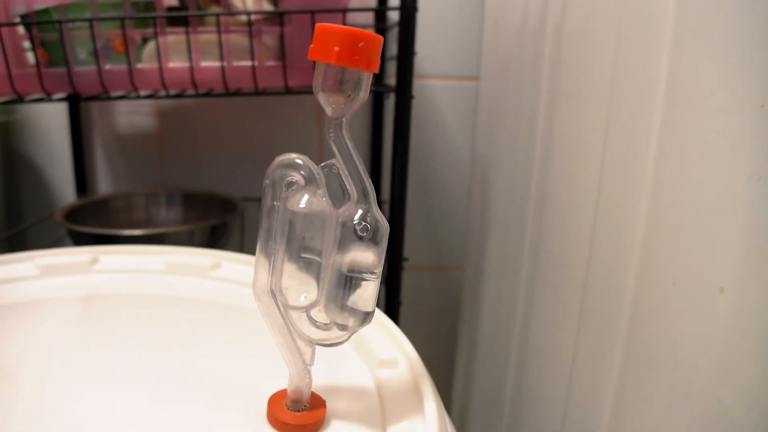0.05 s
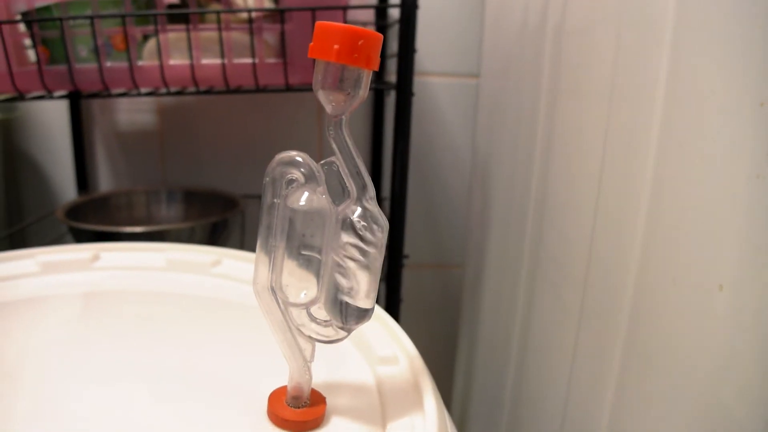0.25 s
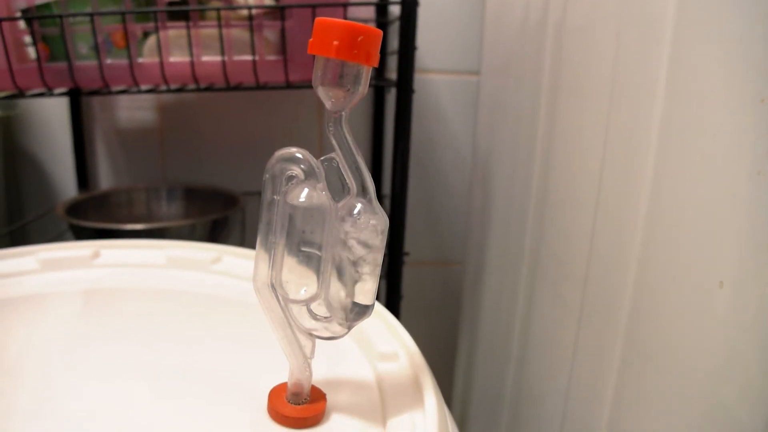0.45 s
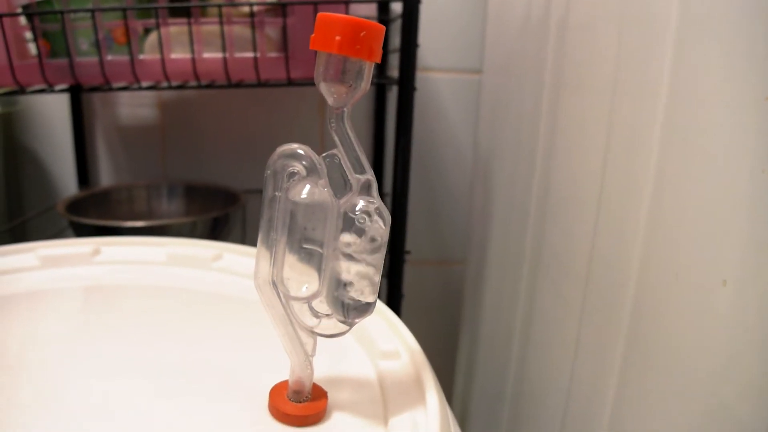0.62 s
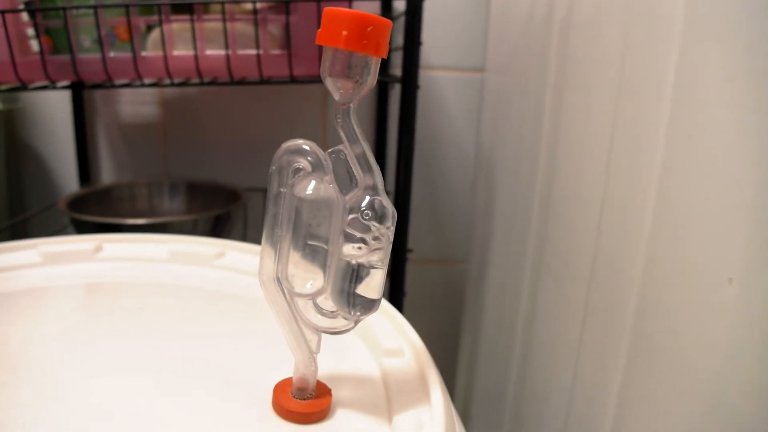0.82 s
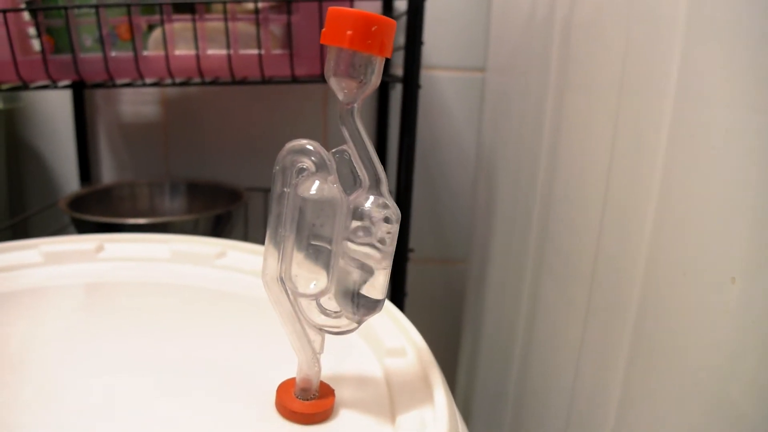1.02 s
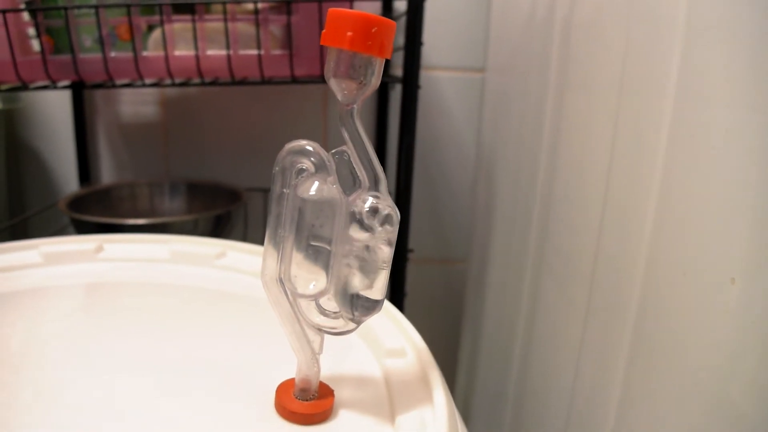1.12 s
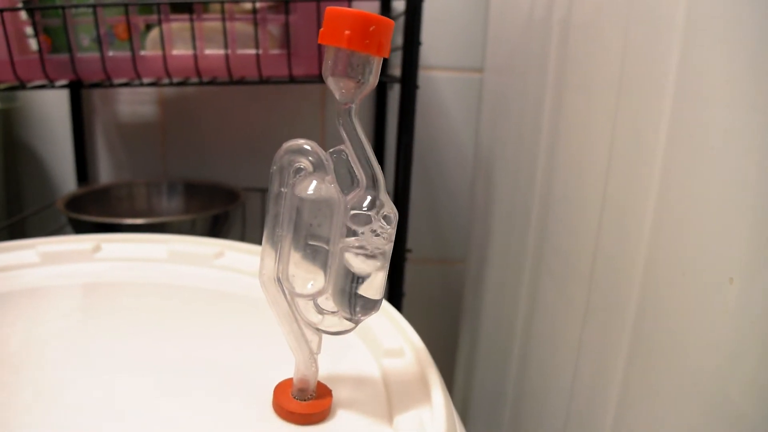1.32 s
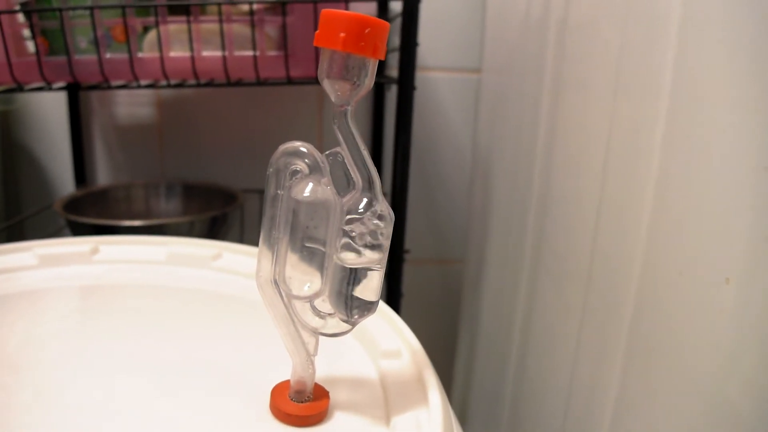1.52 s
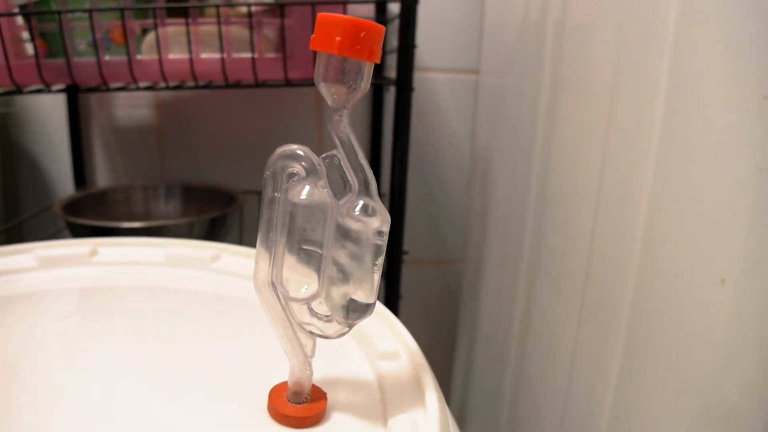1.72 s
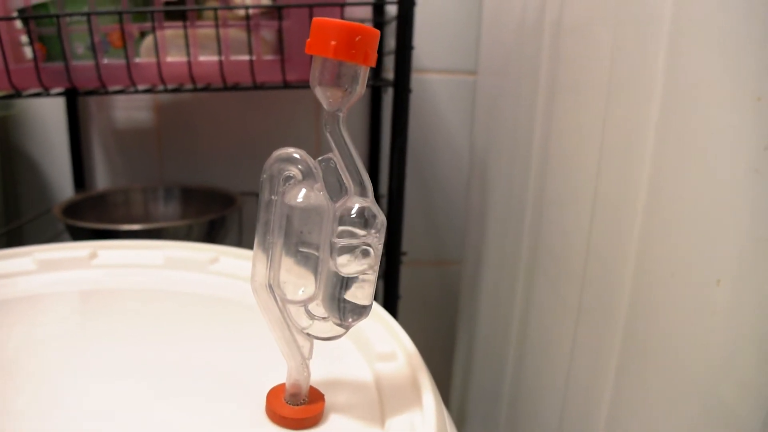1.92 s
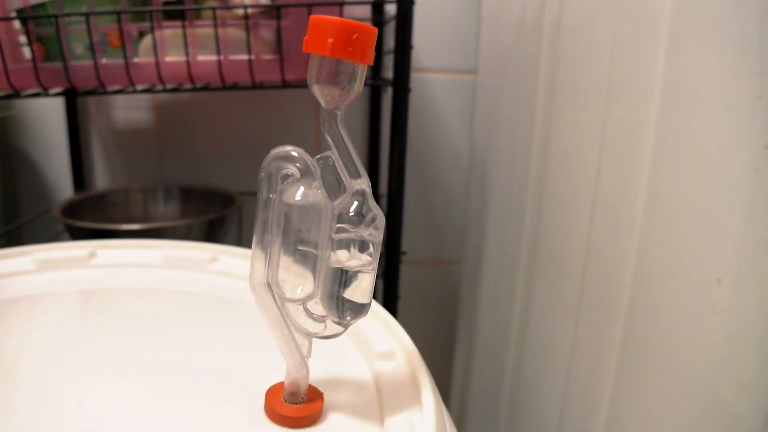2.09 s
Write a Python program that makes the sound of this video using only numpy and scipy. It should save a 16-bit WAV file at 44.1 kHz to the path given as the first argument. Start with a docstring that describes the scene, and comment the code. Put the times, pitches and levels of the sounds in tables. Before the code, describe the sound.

Gas bubbles through a plastic airlock on a bucket, heard close in a small tiled room. Rising blips and tiny ticks start around 0.2 seconds, thickening into hollow plops and gurgles with a rasping hiss near 0.5 seconds. Strong gulps return from 1 second, followed by a sharp tick at 1.3 and a second hiss near 1.4. A last gulp comes around 1.8 seconds over faint low rumble.

```python
"""A plastic airlock on a fermenting bucket in a small tiled room, heard from a close stereo microphone.
Over a low rumble and a faint hiss, films snap with tiny ticks and gas pushes through the water trap.
Each gulp starts with a bubble that chirps upward as it rises, the bucket and lid ringing along;
then it plops into the air chamber, and small bubbles gurgle in the stirred water. The hiss swells
with a rasp near 0.5 s and again near 1.4 s; the last gulp comes at about 1.8 s."""
import sys
import numpy as np
from scipy import signal
from scipy.io import wavfile

SR = 44100
rng = np.random.default_rng(int(sys.argv[2]) if len(sys.argv) > 2 else 0)


def generate_wav(signal):
    """Clip the signal to [-1, 1] and save it as 16-bit WAV at the path in sys.argv[1]."""
    frames = np.transpose(np.atleast_2d(signal))
    scaled = np.clip(frames, -1, 1) * 32767
    pcm = np.round(scaled).astype(np.int16)
    wavfile.write(sys.argv[1], SR, pcm)


N = 94815
T = np.arange(N) / SR


def from_db(db):
    """Decibels to gain."""
    return 10 ** (np.asarray(db) / 20)


def unit_rms(x):
    """Scale to rms 1."""
    return x / np.sqrt(np.mean(x ** 2) + 1e-20)


def level(rows):
    """Gain over time from rows of (time [s], level [dB])."""
    return from_db(np.interp(T, *np.transpose(rows)))


def at_hz(rows, hz):
    """Read a table on a log-frequency axis."""
    freqs, values = np.transpose(rows)
    return np.interp(np.log(hz), np.log(freqs), values)


def drift(rate_hz):
    """Slow random motion of spread 1."""
    step, settle = 40, 2000
    pole = np.exp(-2 * np.pi * rate_hz * step / SR)
    white = rng.standard_normal(N // step + settle + 2)
    slow = signal.lfilter([1], [1, -2 * pole, pole * pole], white)[settle:]
    return np.interp(np.arange(N) / step, np.arange(len(slow)), unit_rms(slow))


def noise(colour, flicker_db=0):
    """Stereo noise in half-octave bands, each with its own level, flicker and width; rms 1."""
    # how alike the microphone's two sides are: (frequency [Hz], correlation [0..1])
    likeness = [(30, 0.52), (200, 0.88), (700, 0.65), (1400, 0.73), (2800, 0.62), (5000, 0.067), (9000, 0),
                (15000, 0.067)]
    out, edges = 0, 22 * 2 ** np.arange(0, 9.6, .5)
    white = rng.standard_normal((2, 2, N))
    for k, (low, high) in enumerate(zip(edges, edges[1:])):
        if high < colour[0][0]:
            continue
        hz = np.sqrt(low * high)
        band = signal.butter(2, [low, high], "band", fs=SR, output="sos")
        mid, side = signal.sosfilt(band, white[k % 2])
        alike = at_hz(likeness, hz)
        gain = from_db(at_hz(colour, hz) + flicker_db * drift(23.7))
        out += gain * (np.sqrt(1 + alike) * mid + np.sqrt(1 - alike) * side * [[1], [-1]])
    return unit_rms(out)


def tone(peak_s, hz, db, t60, attack_s, rise_hz_per_s=0, hold_s=1, phase=np.pi):
    """A dying, gliding oscillation, strongest at peak_s and choked hold_s later."""
    out = np.zeros(N)
    span = slice(max(int((peak_s - .01) * SR), 0), int((peak_s + t60 * 1.5) * SR))
    t = T[span] - peak_s
    swell = np.sin(np.pi / 2 * np.clip(1 + t / attack_s, 0, 1)) ** 2
    decay = from_db(db - 60 * np.maximum(t, 0) / t60)
    choke = .5 - .5 * np.tanh((t - hold_s) / .002)
    out[span] = swell * decay * choke * np.cos(2 * np.pi * (hz + rise_hz_per_s * t / 2) * t + phase)
    return out


def resonate(x, modes):
    """Add the ring of narrow resonances to a sound."""
    ring = 0
    for hz, width_hz, db in modes:
        r = np.exp(-np.pi * width_hz / SR)
        feedback = [1, -2 * r * np.cos(2 * np.pi * hz / SR), r * r]
        ring += from_db(db) * signal.lfilter(np.array([1, 0, -1]) * (1 - r * r) / 2, feedback, x + 1e-18)
    return x + ring


def room_tone():
    """The quiet room: a steady noise floor and a slowly shifting rumble."""
    # spectra of floor and rumble: (frequency [Hz], level [dB])
    floor_colour = [(25, 17), (100, 5), (200, -10.5), (400, -21), (800, -7.5), (1500, -24), (5000, -61),
                    (15000, -17)]
    rumble_colour = [(22, -11), (35, -8), (62, -8.5), (100, -11.5), (170, -20.5), (350, -18), (700, -23),
                     (15000, -57)]
    # course of the rumble: (time [s], level [dB])
    rumble_level = [(0, -65), (.25, -64), (.4, -55), (.95, -56), (1.2, -53), (1.45, -56), (1.7, -60),
                    (1.95, -57), (2.15, -59)]
    return from_db(-69) * noise(floor_colour) + level(rumble_level) * noise(rumble_colour)


def hiss():
    """Two swells of hollow hiss with an airy top; the first peaks in a rasping spurt."""
    # course of each swell's hollow middle and of the airy top: (time [s], level [dB])
    first_level = [(0, -67.5), (.06, -80), (.12, -94), (.2, -66), (.28, -70), (.4, -45.5), (.44, -44),
                   (.5, -34.5), (.56, -40), (.6, -47), (.665, -37.5), (.7, -43), (.8, -48), (.91, -46.5),
                   (1.0, -55), (1.2, -60.5), (1.4, -82)]
    second_level = [(1.2, -64), (1.29, -57), (1.34, -43.5), (1.39, -42), (1.44, -50), (1.485, -43),
                    (1.52, -48.5), (1.55, -53), (1.62, -56.5), (1.71, -77), (1.85, -70), (2.15, -74)]
    top_level = [(0, -70.5), (.06, -66.5), (.11, -77.5), (.2, -68.5), (.27, -67.5), (.32, -54),
                 (.44, -59.5), (.475, -45), (.7, -48), (.86, -51), (.97, -58), (1.1, -64), (1.25, -65),
                 (1.33, -50), (1.47, -53), (1.53, -62), (1.65, -63.5), (1.73, -69.5), (1.83, -70),
                 (1.95, -62), (2.15, -62.5)]
    # spectra of the swells, the top and the spurt: (frequency [Hz], level [dB])
    first_colour = [(600, -47), (900, -19), (1250, -22.5), (1700, -5), (2300, -2), (3000, -15), (4000, -3),
                    (6000, -31), (15000, -40)]
    second_colour = [(800, -15), (1500, -19), (1900, 18), (2450, 3), (3300, -2), (4700, -6), (7000, -18),
                     (15000, -23)]
    top_colour = [(1000, -4), (2500, 0), (3600, -2), (5500, -3.5), (7500, -0.5), (10000, -5), (13000, 3),
                  (15500, -27)]
    spurt_colour = [(600, -14), (1000, -3.5), (1350, 3.5), (1650, -8), (2300, -1), (3000, -11.5),
                    (5000, -22), (15000, -35)]
    # resonances that make it hollow: (frequency [Hz], width [Hz], gain [dB])
    hollow_modes = [(1780, 170, 0.5), (2050, 15, 1.5), (2272, 19, -1.5), (2574, 23, -15)]
    middle = 0
    for course, colour in [(first_level, first_colour), (second_level, second_colour)]:
        middle += level(course) * unit_rms(resonate(noise(colour, flicker_db=2.5), hollow_modes))
    lean_left = from_db([[.75], [-.75]])
    top = level(top_level) * noise(top_colour, flicker_db=1.33) * lean_left
    spurt_s, spurt_db, attack_s, t60 = .455, -30.5, .013, .24
    age = T - spurt_s
    decay = from_db(spurt_db - 60 * np.maximum(age - attack_s, 0) / t60)
    spurt = np.clip(age / attack_s, 0, 1) * decay * noise(spurt_colour, flicker_db=7.5)
    return from_db(-3.5) * middle + from_db(6.5) * top + spurt


def ticks():
    """Snapping films: a high ping with an uneven crackle around its pitch."""
    # a film snaps: (time [s], pitch [Hz], ping [dB], crackle [dB], t60 [s])
    snaps = [(0.045, 10400, -60, -62, 0.038), (0.2096, 2800, -44, -45, 0.0097),
             (.2094, 5900, -46, -50, 0.008), (.2095, 10500, -38, -56, 0.014),
             (0.2309, 4150, -46, -47, 0.023), (.2308, 11360, -39.5, -46, .02),
             (0.375, 2800, -40, -49, 0.043), (.4565, 2180, -40, -27, 0.01),
             (.4648, 1480, -29.5, -32, 0.058), (.479, 2020, -41, -27.5, 0.037),
             (1.002, 4770, -40, -38, 0.0067), (1.027, 6500, -60, -42.5, 0.025),
             (1.143, 10500, -59, -47.5, .03), (1.264, 10000, -45.5, -61, 0.022),
             (1.2977, 5600, -23, -31.5, 0.011), (1.303, 5700, -42.5, -54, 0.077),
             (1.299, 3980, -48, -47, 0.061), (1.746, 2600, -54.5, -68, 0.049), (.931, 10000, -51, -54, .02),
             (1.78, 11100, -56, -57, .05)]
    out, log_half_width, rough_db = 0, .26, 1.5
    for s, hz, ping_db, crackle_db, t60 in snaps:
        low, high = hz * np.exp([-log_half_width, log_half_width])
        band = signal.butter(2, [low, high], "band", fs=SR, output="sos")
        decay = (T >= s) * from_db(-60 * np.minimum(np.abs(T - s) / t60, 2))
        burst = rng.standard_normal(N) * from_db(rough_db * drift(135)) * decay
        crackle = signal.sosfilt(band, burst + 1e-18) * np.sqrt(SR / 2 / (high - low))
        out += from_db(crackle_db) * crackle + tone(s, hz, ping_db, t60, attack_s=2 / hz)
    return out


def bubbles():
    """Each bubble knocks as it pinches off, then chirps upward; displaced water thumps, the lid bobs."""
    # a bubble breaks loose: (time [s], pitch [Hz], rise [Hz/s], level [dB], t60 [s], hold [s])
    releases = [(.047, 384, 3000, -49.5, .04, .02), (.1675, 240, 6400, -35, 0.073, 0.024),
                (.18, 420, 9000, -42.5, 0.047, 0.0065), (1.751, 444, 7100, -42, 0.068, 0.027),
                (.277, 740, 7060, -44.5, 0.21, 0.033), (.362, 421, 7740, -38, 0.23, 0.058),
                (.376, 605.3, 990, -35, 0.3, 0.062), (.5188, 296, 2480, -22, 0.049, 0.016),
                (.9598, 335, 6250, -24, 0.082, 0.017), (0.983, 344, 3000, -42.5, 0.13, 0.0164),
                (1.053, 417, 4550, -27.5, .06, .045), (1.075, 523, 4060, -39, 0.061, 0.036),
                (1.1485, 247, 1494, -26, 0.051, 0.048), (1.2693, 324, 3000, -22.5, 0.045, 0.068),
                (1.7445, 246.5, 6430, -29, 0.075, 0.043), (1.848, 634, 2500, -34.5, 0.066, 0.013),
                (1.858, 856, 2680, -45.5, 0.21, 0.068)]
    out, onset_s, lid_attack_s = 0, .00147, .011
    for s, hz, rise, db, t60, hold_s in releases:
        crest_s = s + onset_s + .25 / hz
        attack_s = 2 * onset_s + .25 / hz
        knock = tone(crest_s, hz * 1.694, db - 11.5, t60=.013, attack_s=attack_s, phase=0)
        chirp = tone(crest_s, hz, db, t60, attack_s, rise, hold_s, phase=0)
        thump = tone(crest_s, hz=156.6, db=db - 8.5, t60=.071, attack_s=attack_s, phase=0)
        lid = tone(s + lid_attack_s, hz=62.8, db=db - 16, t60=.49, attack_s=lid_attack_s)
        out += knock + chirp + thump + lid
    return out


def bucket(gulps):
    """The gulps, with the bucket and its lid ringing along."""
    # modes of bucket and lid: (frequency [Hz], width [Hz], gain [dB])
    bucket_modes = [(66.4, 2.7, 0), (129, 5.3, -15), (165, 4.6, -19), (255, 8, -3), (345, 7.5, 5),
                    (399, 8.6, 1), (456, 11, -2.5), (627, 21, -18.5)]
    return resonate(gulps, bucket_modes)


def plops():
    """A bubble opens into the air chamber: a short pop and knock, then the chamber's low hum."""
    # a bubble opens: (time [s], chamber pitch [Hz], hum [dB], knock [dB], pop [dB])
    openings = [(.2145, 166, -35.5, -29.5, -38.5), (.2505, 168, -30, -28, -41.5),
                (.2787, 181, -55, -34.5, -44), (.3775, 152, -33, -29.5, -38), (.4343, 164, -27, -25, -28.5),
                (.4655, 165, -26.5, -20, -28), (.520, 171, -33.5, -53, -38), (.538, 183, -33, -22, -25.5),
                (.5567, 163.5, -24.5, -23, -31), (.6085, 161, -30, -23.5, -28.5),
                (1.0083, 169, -22, -17.5, -27), (1.15, 166, -28.5, -34.5, -45),
                (1.288, 183.6, -37, -27, -36), (1.2997, 163, -28.5, -29.5, -28),
                (1.7875, 169, -32, -24.5, -37), (1.8243, 167, -28, -25.5, -32)]
    # modes of the pop: (frequency [Hz], gain [dB], t60 [s])
    pop_modes = [(665, 2, 0.011), (747, -11.5, 0.062), (1028, -18, 0.062)]
    out = 0
    for s, hz, hum_db, knock_db, pop_db in openings:
        hum = tone(s + 1 / hz, hz, hum_db, t60=.13, attack_s=.0096, rise_hz_per_s=860, hold_s=.034)
        knock = tone(s, hz=332.4, db=knock_db, t60=.025, attack_s=.003)
        out += hum + knock
        for mode_hz, db, t60 in pop_modes:
            pop_hz = mode_hz * (1 + .054 * rng.normal())
            out += tone(s, pop_hz, pop_db + db, t60, attack_s=.0023, phase=rng.uniform(0, 2 * np.pi))
    return out


def gurgles():
    """Small bubbles of random size in the stirred water, each ringing a few cycles and rising."""
    # bubble swarms: (time [s], length [s], level [dB], lowest pitch [Hz], highest pitch [Hz])
    swarms = [(0.363, 0.052, -37.5, 233, 744), (0.283, .05, -61, 295, 980), (.932, 0.022, -48.5, 334, 860),
              (1.064, 0.033, -45.5, 313, 636), (1.143, 0.059, -52.5, 406, 1370),
              (1.2613, .007, -36, 500, 990), (1.73, .01, -44, 457, 770), (1.844, .035, -46.5, 277, 1040),
              (1.89, 0.11, -60, 122, 790)]
    out, per_s, ring_cycles, spread_db = 0, 570, 7.5, 6.5
    climb = .22  # share of its pitch range that a swarm climbs from start to end
    for s, length, swarm_db, low_hz, high_hz in swarms:
        draws = rng.random((80, 4))[:int(length * per_s)]
        for k, (jitter, smallness, strength, turn) in enumerate(draws):
            delay = (k + jitter) / per_s
            hz = low_hz * (high_hz / low_hz) ** ((1 - climb) * smallness + climb * delay / length)
            db = swarm_db + spread_db * (2 * strength - 1)
            out += tone(s + delay, hz, db, t60=ring_cycles / hz, attack_s=1 / hz,
                        rise_hz_per_s=18 * hz, phase=2 * np.pi * turn)
    return out


def room(x):
    """Early scatter from lid, shelf and wall, and the tail of the tiled room, widest in the treble."""
    delay_s, build_s = .0055, .002
    age = np.maximum(T - delay_s, 0)
    build = 1 - np.exp(-age / build_s)

    def fade(db, t60):
        return from_db(db) * unit_rms(build * from_db(-60 * np.minimum(age / t60, 10)))

    scatter, tail = fade(db=-16, t60=.21), fade(db=-17, t60=.3)
    response = noise([(100, .024), (15000, 0)]) * (scatter + tail) / np.sqrt(N)
    return signal.fftconvolve(x[None], response, axes=1)[:, :N]


def scene():
    """The airlock close to the microphone, the room behind it, all slightly louder on the right."""
    airlock = bucket(bubbles() + plops() + gurgles())
    snaps = ticks()
    background = room_tone()
    close = airlock + snaps
    direct = np.array([close, np.roll(close, 1)])  # reaches the right side one sample later
    reverb = room(airlock + from_db(1) * snaps)
    return (direct + reverb + hiss() + background) * from_db([[-1.6], [1.1]])


def record(dry):
    """The microphone's signal, cut steeply above 15.1 kHz."""
    return signal.sosfilt(signal.ellip(12, .1, 80, 15100, fs=SR, output="sos"), dry)


dry = scene()
out = record(dry)
generate_wav(out)
```